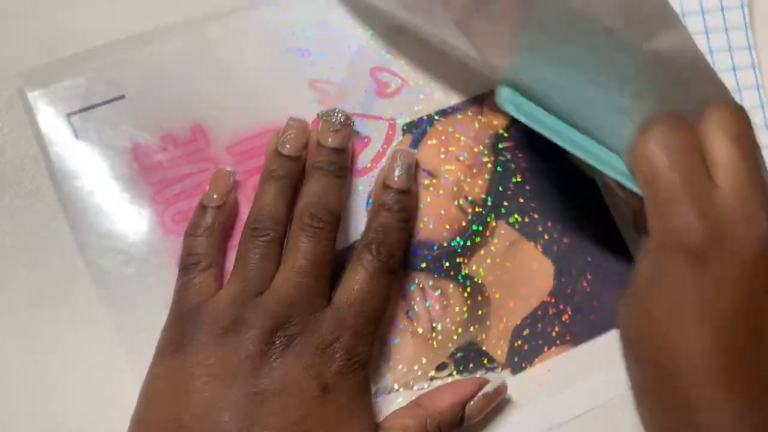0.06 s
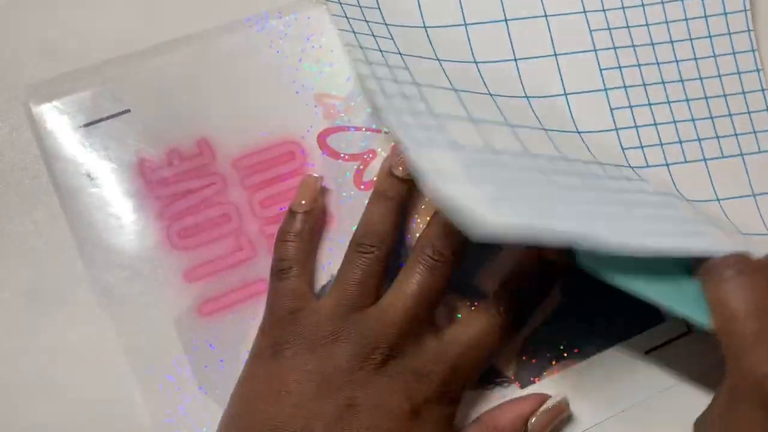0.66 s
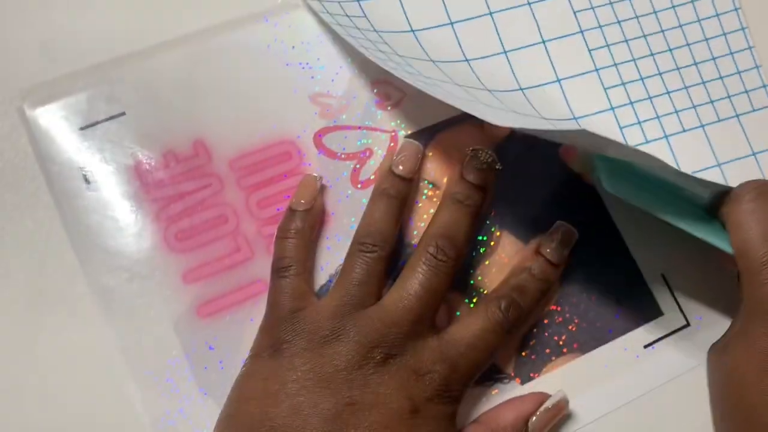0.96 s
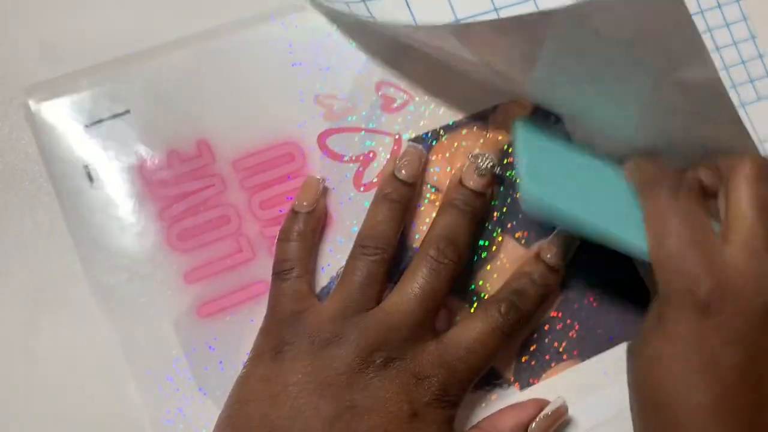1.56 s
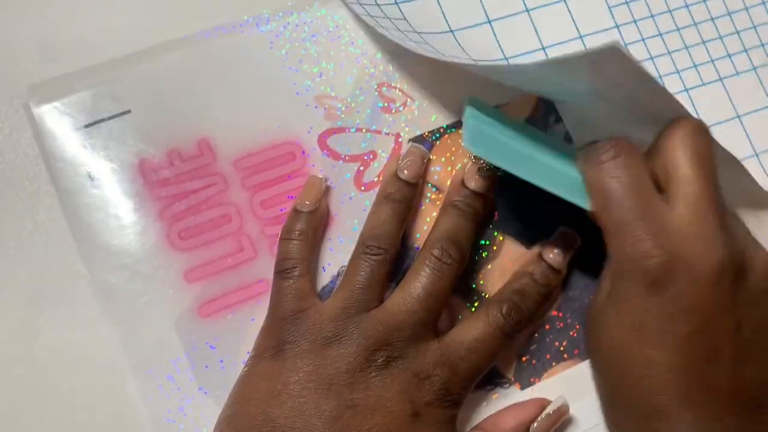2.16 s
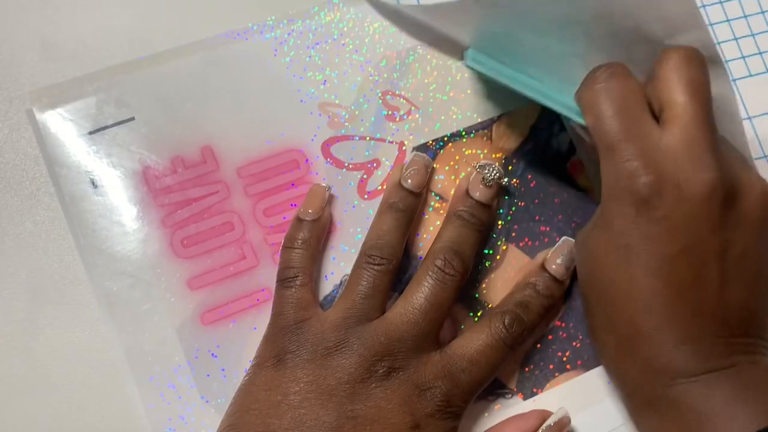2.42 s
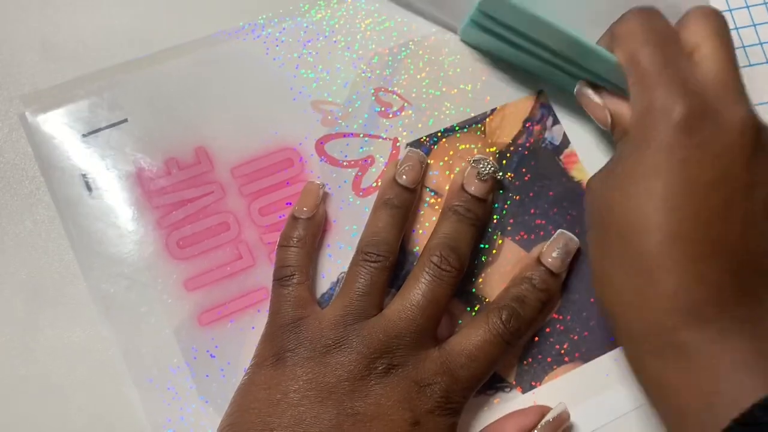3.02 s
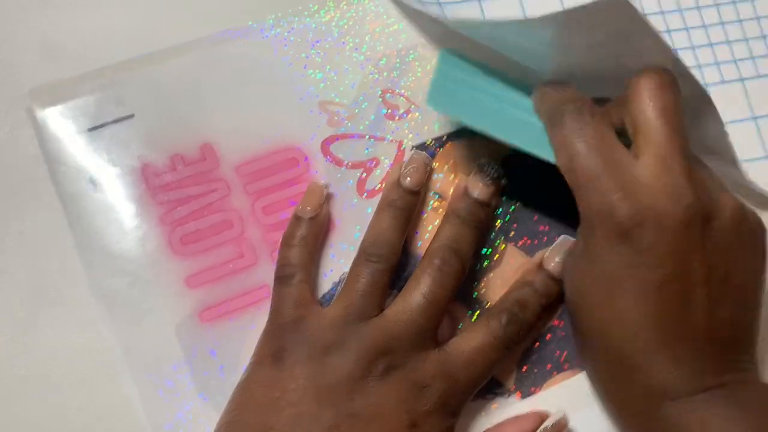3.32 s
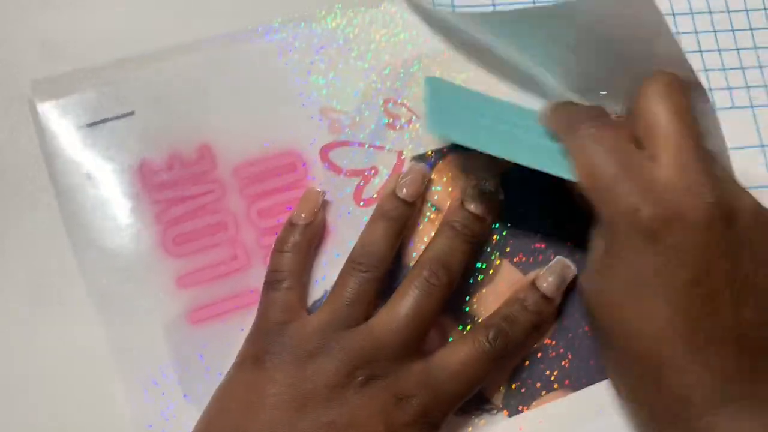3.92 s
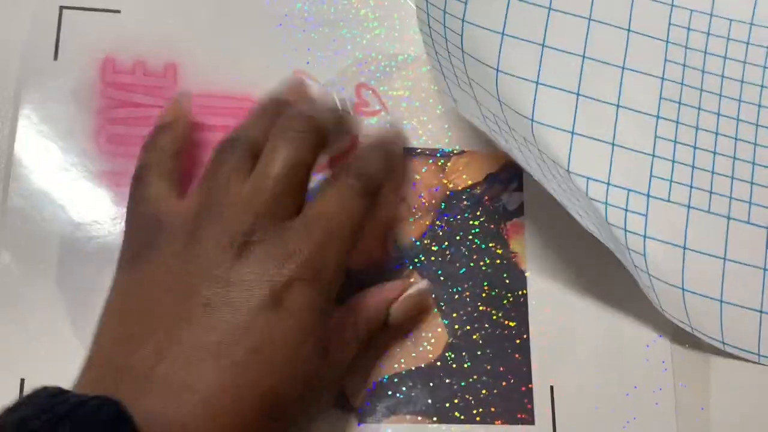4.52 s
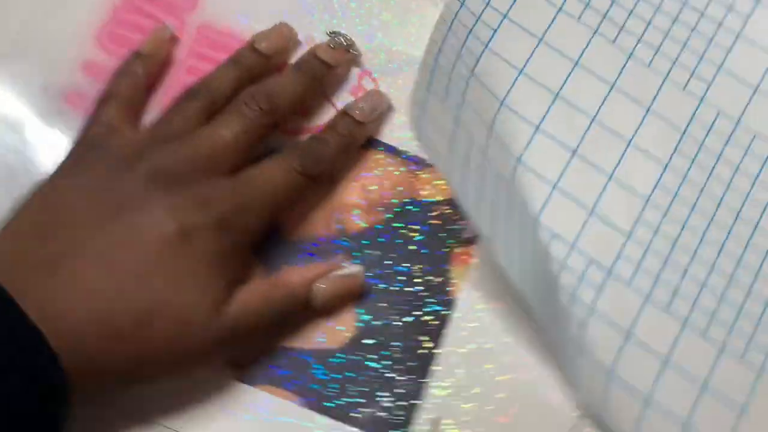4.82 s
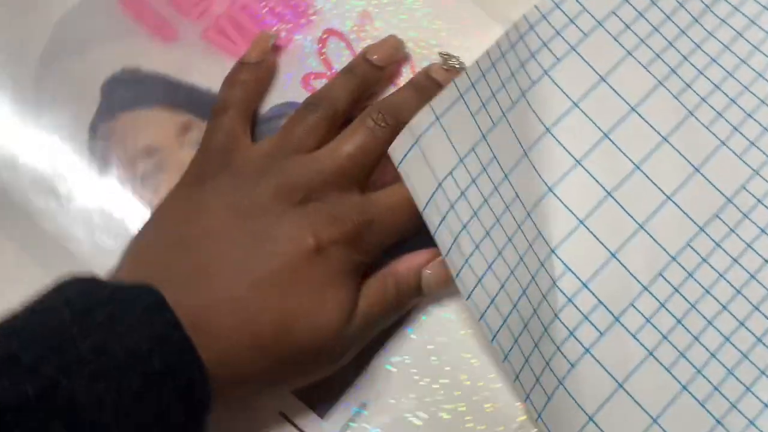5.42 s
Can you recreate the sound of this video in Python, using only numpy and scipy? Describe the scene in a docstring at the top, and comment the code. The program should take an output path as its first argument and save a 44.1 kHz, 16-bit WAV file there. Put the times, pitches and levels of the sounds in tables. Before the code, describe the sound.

A plastic squeegee scrapes and groans over laminate film in short strokes, with taps, one hard knock and crinkling backing paper.

```python
"""A plastic squeegee presses laminate film onto a print on a craft table, close up in a small room, in mono.
The blade sticks and slips in short juddering strokes, groans where it grips, taps, and once knocks down hard.
The film chirps as it lets go, creases snap, the curled sheet buckles and backing paper hisses across it.
Hands thud and bump on the table; the loose sheet rings along with all the handling."""
import sys
import numpy as np
from scipy import signal
from scipy.fft import rfft, irfft, next_fast_len
from scipy.io import wavfile
from scipy.ndimage import uniform_filter1d

SR = 44100
rng = np.random.default_rng(int(sys.argv[2]) if len(sys.argv) > 2 else 0)


def to_wav(s):
    """Save 16-bit WAV."""
    ch = np.atleast_2d(s).T  # columns
    pcm = np.round(np.clip(ch, -1, 1) * 32767)  # PCM
    wavfile.write(sys.argv[1], SR, pcm.astype(np.int16))


N = 241579
EDGE_HZ = 15800  # top of the spectrum
LIGHT_LOW_HZ = 286  # light blows barely move the table below this
# colour of the backing paper's hiss: (frequency [Hz], level [dB])
PAPER_COLOUR = [(200, -38), (700, -41), (1100, -24), (1500, -16.5), (1850, -2), (2800, -1.5), (3700, 4.5),
                (5200, -2.5), (6800, 7.5), (7600, -8), (8800, 3.5), (10300, -8), (13500, -4.5), (15500, 0)]


def amp(db):
    """Decibels to gain."""
    return 10 ** (np.asarray(db) / 20)


def unit(x):
    """Scales to rms 1."""
    return x / np.sqrt(np.mean(x ** 2) + 1e-20)


def read(points, hz):
    """Reads a curve on a log-frequency axis."""
    f, value = np.transpose(points)
    return np.interp(np.log(hz + 1), np.log(f + 1), value)


def add(mix, start, sound):
    """Mixes a sound in at a start time in seconds."""
    part = mix[max(round(start * SR), 0):][:len(sound)]
    part += sound[:len(part)]


def noise(colour, size):
    """Steady coloured noise of rms 1."""
    gain = amp(read(colour, np.fft.rfftfreq(size, 1 / SR)))
    return unit(irfft(rfft(rng.standard_normal(size)) * gain, size))


def wander(hz, size):
    """Random drift of rms about 1, rolled off above hz."""
    span = next_fast_len(size + 4096)
    f = np.fft.rfftfreq(span, 1 / SR)
    return unit(irfft(rfft(rng.standard_normal(span)) / (1 + (f / hz) ** 4), span))[:size]


def push(t, rise, hold, release, easing=.8, swell_db=34.5, fade_db=36):
    """Envelope of one push of the hand in dB: it swells, holds and lets go."""
    swell = np.maximum(1 - t / rise, 0) ** 2
    fade = (np.maximum(t - rise - hold, 0) / release) ** easing
    return -swell_db * swell - fade_db * fade


def body_rings(low_hz=0, tone=((0, 0),), size=4096):
    """How table, blade and film answer one kick: four minimum-phase band responses of energy 1."""
    # the table, blade, film and fizz bands: (low edge [Hz], high edge [Hz])
    bands = [(100, 550), (550, 1400), (1400, 5000), (5000, 15500)]
    # resonances of blade, film and table together: (frequency [Hz], level [dB])
    body = [(110, -2.5), (230, -8), (400, 4), (520, -5.5), (660, 3.5), (840, 0), (1040, 5.5), (1380, -6.5),
            (1900, 1), (2800, 7.5), (4000, -4.5), (7500, -14), (8800, -9), (10300, -21.5), (13500, -17)]
    hz = np.abs(np.fft.fftfreq(size, 1 / SR)) + 1
    colour = amp(read(body, hz) + read(tone, hz))
    rings = []
    for lo, hi in bands:
        gain = colour / np.sqrt((1 + (max(lo, low_hz) / hz) ** 12) * (1 + (hz / hi) ** 16))
        log_spectrum = np.conj(signal.hilbert(np.log(gain + gain.max() * 1e-4)))
        response = np.fft.ifft(np.exp(log_spectrum)).real[:size // 2]
        rings.append(response / np.linalg.norm(response))
    return rings


def room_tone(db=-67):
    """A faint, steady bed of rumble and hiss."""
    # colour of the quiet room: (frequency [Hz], level [dB])
    colour = [(20, 3), (33, 5), (48, 5.5), (63, 0.5), (90, -8.5), (160, -17), (300, -24.5), (650, -21.5),
              (1500, -35), (3200, -27), (6000, -41), (15000, -53.5)]
    return amp(db) * noise(colour, N)


def room(x, wet_db, build_s=0.0093, size=20000):
    """Adds echoes off table and walls, then a short diffuse tail."""
    # decay of the tail: (frequency [Hz], t60 [s])
    decay = [(150, 0.033), (550, 0.25), (1400, 0.26), (3700, 0.16), (9700, 0.19), (15000, 0.34)]
    # early reflections: (delay [s], gain [linear])
    echoes = [(.0031, 0.036), (.0083, -0.17), (0.018, 0.025), (0.0244, -0.27), (0.028, 0.043)]
    hz, t, spectra = signal.stft(rng.standard_normal(size), SR, nperseg=256)
    tail = signal.istft(spectra * amp(-60 * t / read(decay, hz)[:, None]), SR, nperseg=256)[1]
    tail *= 1 - np.exp(-(np.arange(len(tail)) / SR / build_s) ** 2)
    response = amp(wet_db) * tail / np.linalg.norm(tail)
    response[0] += 1
    for delay, gain in echoes:
        add(response, delay, gain * np.array([.2, .6, .2]))  # soft surfaces dull the echo
    return signal.fftconvolve(x, response)[:N]


def sheet_ring(x, spread=0.055, size=20000):
    """Adds the after-ring of the loose sheet."""
    # clusters of close modes: (centre [Hz], level [dB], t60 [s])
    clusters = [(664, -16, 0.27), (1060, -18, 0.6), (2660, -19, .4)]
    t, hz = np.arange(size) / SR, np.fft.rfftfreq(size, 1 / SR)
    response = 0
    for centre, db, t60 in clusters:
        tail = rng.standard_normal(size) * amp(-60 * t / t60)
        peak = 1 / (1 + 1j * (hz - centre) / (spread * centre)) ** 2
        response += amp(db) * irfft(rfft(tail / np.linalg.norm(tail)) * peak, size)
    return x + signal.fftconvolve(x, response)[:N]


def table_bumps(unsteady_rad=0.92):
    """Soft pushes of the hands sway the table top."""
    # the table rocks: (time [s], level [dB], length [s], lift of the upper modes [dB])
    bumps = [(1.045, -68, 0.04, 12), (1.575, -61, 0.12, 5), (3.353, -45.5, 0.079, 0.5),
             (3.43, -59, 0.19, 5), (3.652, -48, 0.14, -7), (3.779, -57.5, 0.097, -11.5),
             (5.05, -59, 0.14, 16), (5.257, -58, 0.066, 21)]
    # the table's slow modes: (frequency [Hz], level [dB])
    modes = [(31, 5), (62, -15), (107, -9.5), (148, -12.5), (190, -14.5)]
    for start, db, length, hardness_db in bumps:
        t = np.arange(int(length * SR)) / SR
        sway = 0
        for k, (hz, mode_db) in enumerate(modes):
            phase = 2 * np.pi * (hz * t + rng.random()) + unsteady_rad * wander(60, len(t))
            sway += amp(mode_db + hardness_db * (k > 0)) * np.sin(phase)
        yield start, amp(db) * unit(sway * np.hanning(len(t)))


def paper_slides(flicker_db=1.32, catches_per_s=900, grain=0.39):
    """Paper fibres brush the film: fine hiss with tiny catches, over the curled sheet's hollow ring."""
    # glides: (time [s], rise [s], hold [s], release [s], level [dB], relative ring [dB], width [0-1])
    slides = [(0.0, 0.079, 0.053, .1, -62.5, 3, 0), (0.081, 0.11, 0.013, 0.16, -52, -2.5, 0.5),
              (0.319, 0.048, 0.031, .08, -69.5, 0, 0.4), (0.651, .03, 0.041, .06, -90, 7, 0),
              (0.801, 0.1, .03, 0.21, -61.5, 8, 0), (1.238, 0.023, 0.011, 0.045, -42.5, -7.5, 0.06),
              (1.863, 0.075, 0.071, 0.096, -75.5, -1, 0.13), (2.048, .03, .03, 0.13, -63, -3, 0),
              (2.218, 0.074, 0.071, 0.095, -62, -3.5, 0.1), (3.213, .1, 0.031, 0.083, -80, 3.5, 0),
              (3.829, 0.084, 0.048, 0.076, -60.5, -8, .3), (4.16, 0.077, 0.16, 0.074, -51, -9.5, 0.63),
              (4.436, 0.032, 0.015, 0.087, -61.5, -6, 0.37), (4.604, 0.018, .02, 0.084, -70.5, -13, .9),
              (4.67, 0.12, 0.089, 0.18, -43, -21, 0.9), (5.28, 0.22, 0.019, 0.093, -51, -12, .9)]
    # paper pulled wide, whose larger free span sounds lower: (frequency [Hz], level [dB])
    wide_colour = [(240, -80), (400, -50), (425, -30), (496, -54), (694, -35.5), (1660, -20), (1910, -4),
                   (2220, -10), (2630, -1.5), (3740, -3), (5650, -7.5), (8930, -5), (10100, -12.5),
                   (14400, -7.5), (15500, -12.5)]
    # the hollow of the curl: (frequency [Hz], level [dB])
    curl_colour = [(300, -28), (650, -19.5), (1000, -15.5), (1400, -27.5), (2100, -10), (2600, 4.5),
                   (3100, 0.5), (3600, -14), (4400, 3), (5500, -25), (15000, -41.5)]
    t, hz = np.arange(SR) / SR, np.fft.rfftfreq(SR, 1 / SR)
    for start, rise, hold, release, db, hollow_db, width in slides:
        catches = (rng.random(SR) < catches_per_s / SR) * rng.standard_normal(SR)
        friction = rng.standard_normal(SR) + grain * unit(catches)
        colour = amp((1 - width) * read(PAPER_COLOUR, hz) + width * read(wide_colour, hz))
        hiss = unit(irfft(rfft(friction) * colour, SR))
        speed_db = push(t, rise, hold, release, easing=1.34) + flicker_db * wander(50, SR)
        hollow = noise(curl_colour, SR) * amp(.8 * speed_db)  # the ring grows more slowly than the hiss
        yield start, amp(db) * (hiss * amp(speed_db) + hollow * amp(hollow_db))


def sheet_buckles(t60=.12, rise_s=0.0012, upper_ratio=1.12, upper_db=-8):
    """The curled sheet flips its curve and rings in two close modes."""
    # hollow notes: (time [s], pitch [Hz], level [dB])
    buckles = [(.252, 618, -50), (.292, 490, -58), (.391, 412, -53.5), (.585, 410, -66), (1.437, 480, -47),
               (2.295, 537.3, -39), (2.806, 357, -52), (4.066, 624, -51), (4.251, 647, -48),
               (4.5, 626, -52.5), (4.618, 410, -54)]
    t = np.arange(12000) / SR
    for start, hz, db in buckles:
        phase = 2 * np.pi * hz * t
        modes = np.sin(phase) + amp(upper_db) * np.sin(upper_ratio * phase)
        yield start, modes * amp(db - 60 * t / t60) * (1 - np.exp(-t / rise_s))


def blow(hit, rings, colour_db, attack_s, settle_s, settle, firm_db=-42, softening=0.069, size=3000):
    """A noise burst rings the four bands and settles: firm blows snap, light ones rustle more softly."""
    time, db, tilt_db = hit
    levels_db = db + np.array(colour_db) + tilt_db * (np.arange(4) - np.argmax(colour_db))
    rise_s = attack_s * (1 + 2 * softening * np.clip(firm_db - max(levels_db), 0, 20))
    t = np.arange(size) / SR
    spike = t / rise_s * np.exp(1 - t / rise_s)
    tail = settle * np.exp(-t / settle_s) * (1 - np.exp(-t / rise_s))
    burst = (spike + tail) * rng.standard_normal(size)
    # the flex comes back from the sheet's nearest edge, which hollows each blow in its own way
    burst += .65 * np.roll(burst, rng.integers(18, 70))
    out = 0
    for response, band_db in zip(rings, levels_db + (0, .5, .5, 0)):
        band = signal.fftconvolve(burst, response)[:size]
        out += amp(band_db) * band / np.sqrt(np.sum(band ** 2) / (.007 * SR))  # level over 7 ms
    return time - rise_s, out


def finger_thuds():
    """Fingers and the blade's flat press the stack onto the table."""
    # dull blows: (time [s], level [dB], treble tilt [dB per band])
    thuds = [(0.4892, -69, -3), (0.5851, -66, 2.5), (1.0669, -44, -1.5), (1.4371, -43, 1.5),
             (1.5814, -41.5, -1), (1.598, -35, -4), (2.2969, -43, -5), (5.2818, -55, 1)]
    rings = body_rings()
    for hit in thuds:
        yield blow(hit, rings, (-1, -9, -9.5, -27.5), attack_s=.001, settle_s=0.011, settle=0.21)


def crease_snaps():
    """Creases in film and paper give way with a crisp crack."""
    # snaps: (time [s], level [dB], treble tilt [dB per band])
    creases = [(0.077, -52.5, 5), (0.2747, -52, 7.5), (0.3393, -58, 10), (0.5357, -62.5, 1),
               (0.5487, -64.5, 1), (0.7662, -55.5, -1), (0.7833, -57.5, -2.5), (0.86, -44.5, -2),
               (1.191, -52.5, 10.5), (1.569, -35, -1), (1.6546, -46.5, -6.5), (2.0634, -41.5, 1),
               (2.8274, -69, -5), (2.974, -41, 10), (2.9925, -41.5, 15.5), (3.0151, -38.5, -1.5),
               (3.1468, -62, 4), (3.379, -66, -6.5), (3.398, -57.5, -6.5), (3.464, -37.5, 7.5),
               (3.4771, -34, -3.5), (3.49, -39.5, 1), (3.9345, -48, -3), (3.9456, -46.5, 5.5),
               (4.258, -38.5, 7.5), (4.4838, -50.5, 3), (4.602, -68.5, 18), (4.621, -58, 8),
               (5.0554, -44.5, 5), (5.2575, -59.5, 8.5)]
    # emphasis of the film's short, high folds: (frequency [Hz], level [dB])
    fold_tone = [(1000, -3), (2800, -1), (4100, 7), (5200, 0), (8000, -0.5)]
    rings = body_rings(LIGHT_LOW_HZ, fold_tone)
    for hit in creases:
        yield blow(hit, rings, (-11.5, -12.5, -0.5, -12), attack_s=0.00084, settle_s=0.013, settle=0.42)


def squeak(path, jitter=0.041, flutter=0.73, dulling=0.3):
    """Stick-slip fast enough to sing: harmonics follow a path of pitch and level, shaken by roughness."""
    # colour of the harmonics: (frequency [Hz], level [dB])
    colour = [(520, 0), (680, 0), (1100, -1), (1650, -10), (2250, -3), (2750, -7), (3300, -11), (3800, -16),
              (4350, -13), (5200, -27), (9000, -31), (15000, -41)]
    times, *columns = np.transpose(path)
    t = np.arange(times[0], times[-1], 1 / SR)
    hz, db, overtones_db, rough = (np.interp(t, times, column) for column in columns)
    grip_hz = 0.2 * hz.mean()  # the grip changes every few slips
    phase = 2 * np.pi * np.cumsum(hz * (1 + jitter * rough * wander(400, len(t)))) / SR
    tone, power = 0, 0
    for k in range(1, 24):
        # a gentle grip loses its highest overtones first
        upper_db = overtones_db * (k > 1) + dulling * np.minimum(overtones_db, 0) * max(k - 4, 0) ** .5
        gain = amp(read(colour, k * hz) + upper_db) * (k * hz < EDGE_HZ)
        grip = wander(grip_hz, len(t)) + 1j * wander(grip_hz, len(t))
        shake = 1 - rough ** 2 + flutter * rough * grip
        tone += gain * (shake * np.exp(1j * (k * phase + rng.uniform(-0.27, 1)))).real
        power += gain ** 2 * np.mean(np.abs(shake) ** 2) / 2
    return times[0], amp(db) * tone / np.sqrt(power) * signal.windows.tukey(len(t), .06)


def film_chirps(ends_db=-18, rasp_db=-3):
    """The film lets go in tiny squeaks, each one arch of level over one glide; rough ones also rasp."""
    # (time [s], length [s], pitch [Hz], glide [octaves], level [dB], overtones [dB], roughness [0-1])
    chirps = [(1.243, 0.02, 4100, -0.064, -45.5, -10, 0.6), (1.254, .026, 3160, -.2, -39.5, 4, .7),
              (1.833, .046, 867.5, 0, -41, -26, .15), (3.428, .014, 2164, 0.11, -36, -4.5, 0.52),
              (3.445, 0.0086, 3040, 0, -34, 0.5, .45), (3.447, 0.012, 2330, -0.091, -34, 5, .4),
              (3.731, 0.018, 3240, 0.059, -63, -7.5, 0.36), (3.931, .012, 2676, 0.14, -43, -16, 0.3)]
    u = np.linspace(-1, 1, 9)
    for start, length, hz, glide, db, overtones_db, rough in chirps:
        arch = zip(start + length * (u + 1) / 2, hz * 2 ** (glide * u / 2), db + ends_db * u ** 2)
        _, tone = squeak([(*point, overtones_db, rough) for point in arch])
        rasp = rough * noise(PAPER_COLOUR, len(tone)) * np.hanning(len(tone))
        yield start, tone + amp(db + overtones_db + rasp_db) * rasp


def blade_taps(vary_db=3, contact_s=.0004):
    """Blade edge and nails click on the film and ring the blade, each time in another mix of modes."""
    # hard contacts: (time [s], level [dB], treble tilt [dB per band])
    taps = [(.031, -46, -1), (.048, -39.5, 4.5), (.9883, -41, 0), (0.998, -41.5, 6), (1.0168, -35, -4.5),
            (1.0582, -32.5, -6), (1.0966, -44, 2.5), (1.1189, -43, 1.5), (1.125, -43.5, 3.5),
            (1.1438, -40, 5.5), (1.1693, -50.5, 10.5), (1.559, -33.5, -3), (1.6169, -43.5, 3.5),
            (2.1937, -48, 0.5), (2.2879, -38.5, -3), (2.6745, -41, -0.5), (2.9146, -41.5, -1),
            (3.5168, -40, -2), (3.5772, -34, -2), (4.033, -42.5, -2), (4.0665, -46, -2),
            (4.251, -40.5, -10.5), (4.2792, -47.5, -2), (4.3223, -37, -2.5), (5.0076, -52.5, 7.5),
            (5.0729, -34.5, 2.5), (5.1363, -43.5, 3.5), (5.1545, -45.5, -0.5)]
    # the tapped blade: (frequency [Hz], level against the tap [dB], t60 [s])
    modes = [(643, -13, .035), (1026, -1.5, 0.032), (1560, -10.5, .025)]
    rings = body_rings(LIGHT_LOW_HZ)
    for hit in taps:
        start, click = blow(hit, rings, (-15, -2, -7.5, -27.5), attack_s=.0007, settle_s=0.014,
                            settle=.17, firm_db=-48, softening=0.045)
        t = np.arange(len(click)) / SR
        ring = 0
        for k, (hz, db, t60) in enumerate(modes):
            struck_db = hit[1] + db + vary_db * rng.uniform(-1.1, 1)
            ring += (-1) ** k * amp(struck_db - 60 * t / t60) * np.sin(2 * np.pi * hz * t)
        yield start, click + ring * (1 - np.exp(-t / contact_s))


def blade_knock(contact_s=0.00036, skid_db=-40, skid_s=0.028, size=8000):
    """The stiff plastic blade hits the table, rings briefly and skids to rest."""
    # the one hard landing: (time [s], level [dB])
    landing = (1.7378, -16.5)
    # the struck blade: (frequency [Hz], level [dB], t60 [s])
    modes = [(642, -9, 0.052), (875, -7, 0.023), (1087, -12.5, 0.13), (1580, -2.5, 0.014),
             (1670, -1, 0.0093), (2456, 2, 0.015), (2920, 3.5, 0.0076), (3620, -10.5, 0.0047),
             (4210, -23, 0.024)]
    start, level_db = landing
    t = np.arange(size) / SR
    ring = sum((-1) ** k * amp(db - 60 * t / t60) * np.sin(2 * np.pi * hz * t)
               for k, (hz, db, t60) in enumerate(modes))
    midrange = signal.butter(3, [600, 2700], "bandpass", fs=SR, output="sos")
    rub = unit(signal.sosfilt(midrange, rng.standard_normal(size)))
    skid = amp(skid_db) * rub * 2 * t / skid_s * np.exp(1 - 2 * t / skid_s)
    yield start, amp(level_db) * ring * (1 - np.exp(-(t / contact_s) ** 2)) + skid


def blade_groans():
    """The blade grips clean film and slips hundreds of times a second; the pitch follows its speed."""
    # one path a groan: (time [s], pitch [Hz], level [dB], overtones [dB], roughness [0-1])
    groans = [
        [(.897, 520, -48, -7, 0.34), (.91, 539.4, -30.5, 3, 0.12), (.931, 572.4, -26, 6, 0.13),
         (.942, 555, -31, 16, 0.18), (.952, 545, -26, -6.5, 0.1), (.972, 508, -26.5, -1.5, .25),
         (.981, 476, -41, -1.5, 0.65), (1.002, 473, -48, 11.5, 0.8)],
        [(2.006, 677, -49.5, -23.5, 0), (2.018, 665, -35, -15.5, 0.18), (2.026, 659, -25.5, -3, 0.13),
         (2.033, 635, -25, -4, 0.06), (2.04, 570, -29, -3, 0.35), (2.046, 545, -41.5, 14, 0.76),
         (2.07, 560, -51, -10, 0.4)],
        [(2.523, 665, -38, -34.5, 0.27), (2.533, 698, -30, -24.5, 0.8), (2.556, 790.5, -26.5, -13.5, .7),
         (2.582, 741, -33.5, -8, .85), (2.62, 700, -41, -2, .85), (2.65, 635, -34.5, -11, 0.83)],
    ]
    for path in groans:
        yield squeak(path)


def blade_strokes(uneven=.33, scratch_s=.0013, kick_spread_db=1.0, grit=0.24):
    """The blade sticks and slips; each slip is a kick and a short scratch over steady rubbing."""
    # pushes: (time [s], rise [s], hold [s], release [s], table band [dB], blade band [dB],
    # film band [dB], fizz band [dB], slip rate [1/s], share of smooth rubbing [0-1])
    strokes = [(0.253, 0.0089, .05, .11, -67, -66.5, -74, -82, 95, 0.4),
               (.575, 0.017, 0.019, 0.048, -70, -82, -83, -95, 100, .7),
               (0.763, 0.033, 0.12, 0.045, -66, -83, -62, -77, 105, 0.76),
               (.89, 0.03, 0.066, .05, -56.5, -48, -40, -51.5, 109, 0.47),
               (1.001, 0.011, 0.14, 0.069, -55.5, -52.5, -64, -78, 110, 0.59),
               (1.109, .035, 0.045, 0.048, -72, -68, -64, -55, 122, 0.5),
               (1.388, 0.046, 0.023, 0.12, -50, -59.5, -60, -72, 104, 0.65),
               (1.53, .033, 0.051, 0.076, -44, -46, -52, -64, 101, 0.67),
               (1.624, 0.019, 0.12, 0.054, -63, -75, -62.5, -69.5, 125, .7),
               (1.743, 0.011, 0.011, 0.067, -65, -38, -48, -76, 210, 0.9),
               (1.777, .03, 0.17, 0.2, -88, -57.5, -71, -90, 160, .85),
               (2.019, 0.015, 0.018, .06, -64, -40.5, -42.5, -42, 204, 0.53),
               (2.066, .02, 0.14, 0.15, -70, -64.5, -64, -76.5, 220, .8),
               (2.264, .023, .012, 0.12, -51.5, -44.5, -55, -54.5, 130, 0.65),
               (2.52, 0.033, 0.076, 0.073, -50, -32.5, -43.5, -45, 158, 0.46),
               (2.661, 0.016, 0.016, 0.055, -65, -49, -54, -63.5, 152, 0.45),
               (2.901, 0.01, 0.041, 0.044, -55.5, -55.5, -58, -79, 105, 0.52),
               (2.94, 0.024, 0.074, 0.071, -49, -46, -45, -44.5, 91.4, 0.45),
               (3.423, 0.055, 0.023, .07, -51, -43, -45.5, -45.5, 90, 0.5),
               (3.572, 0.036, .027, 0.057, -53.5, -41, -44.5, -53, 168, 0.57),
               (4.017, 0.016, 0.054, 0.063, -63.5, -58.5, -68, -70.5, 135, 0.56),
               (4.209, 0.028, 0.097, 0.096, -60.5, -58.5, -54, -53.5, 88, 1),
               (4.458, 0.017, 0.041, 0.067, -68, -68, -75, -72, 94, .8),
               (4.998, 0.011, 0.023, 0.055, -61, -55, -55.5, -59.5, 140, 0.59),
               (5.05, 0.015, 0.0085, 0.083, -48.5, -37.5, -40, -48.5, 130, 0.76),
               (5.092, 0.011, 0.062, 0.18, -61.5, -58, -57.5, -63, 153, 0.61),
               (5.247, 0.013, 0.037, 0.1, -69, -67.5, -67, -70, 157, 0.66)]
    # rise time of the table, blade, film and fizz bands [multiples of the stroke's rise]
    band_rise = (1.2, .9, 0.9, 1.11)
    rings = body_rings()
    for start, rise, hold, release, *levels_db, rate, smooth in strokes:
        t = np.arange(0, rise + hold + 1.5 * release, 1 / SR)
        slip_count = np.cumsum(rate * np.exp(uneven * wander(90, SR)[:len(t)])) / SR
        sizes, scrape, rub = rng.standard_normal((3, SR))[:, :len(t)]
        kicks = np.diff(np.floor(slip_count), prepend=0) * amp(kick_spread_db * np.clip(sizes, -2, 2))
        scratch = signal.lfilter([1], [1, -np.exp(-1 / (scratch_s * SR))], kicks) * scrape
        friction = (1 - smooth) * unit(kicks + grit * scratch) + smooth * rub
        judder = 0
        for response, db, stretch in zip(rings, levels_db, band_rise):
            band = signal.fftconvolve(friction, response)[:len(t)]
            # the hand's pressure, not chance, sets the loudness over many slips
            band /= np.sqrt(np.abs(uniform_filter1d(band ** 2, size=800)) + 1e-12)
            judder += band * amp(db + push(t, rise * stretch, hold + rise * (1 - stretch), release))
        yield start, judder * np.clip(np.minimum(t, t[-1] - t) / 0.004, 0, 1)


def track(*sources):
    """Lays each source's (time, sound) events on one track."""
    mix = np.zeros(N)
    for source in sources:
        for start, sound in source:
            add(mix, start, sound)
    return mix


def scene():
    """All the handling rings the loose sheet and the room, over the room tone."""
    handling = track(blade_strokes(), blade_taps(), crease_snaps(), finger_thuds(), blade_groans(),
                     paper_slides(), sheet_buckles(), film_chirps(), table_bumps())
    mono = room(sheet_ring(handling), wet_db=-13.5)
    # the knock shakes the whole table top and so stirs the room more
    mono += room(sheet_ring(track(blade_knock())), wet_db=-8.5)
    mono += room_tone()
    return np.array([mono, mono])


def record(dry):
    """A steep low-pass takes off the topmost air."""
    low_pass = signal.firwin(511, EDGE_HZ, window=("kaiser", 9), fs=SR)
    return signal.oaconvolve(dry, low_pass[None], "same")


dry = scene()
out = record(dry)
to_wav(out)
```